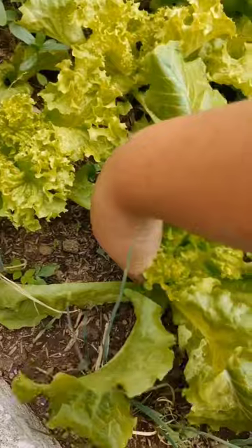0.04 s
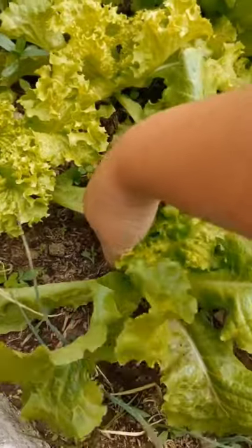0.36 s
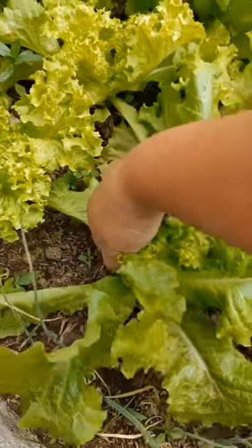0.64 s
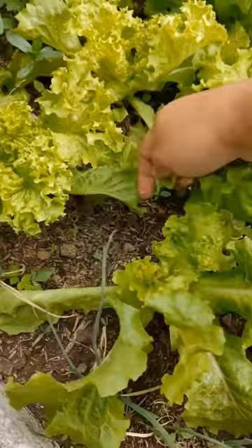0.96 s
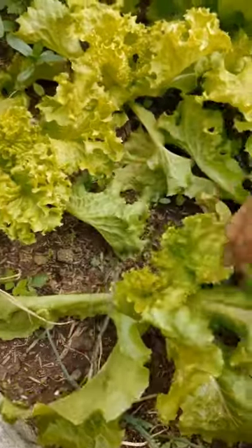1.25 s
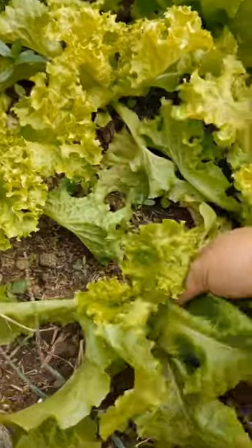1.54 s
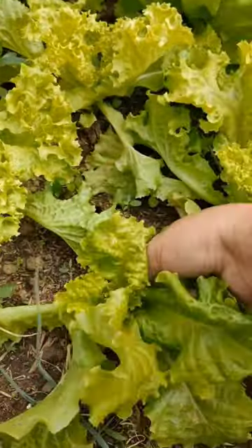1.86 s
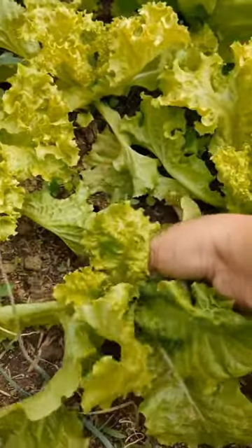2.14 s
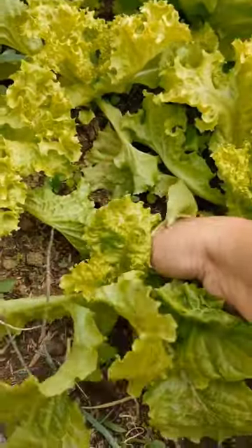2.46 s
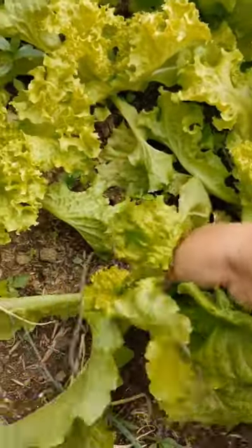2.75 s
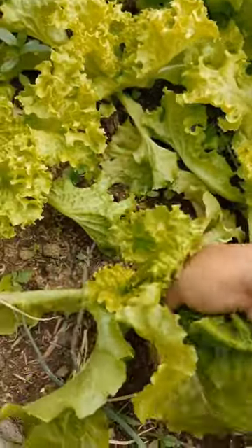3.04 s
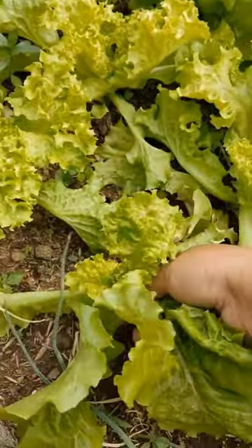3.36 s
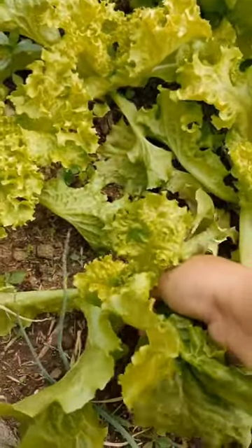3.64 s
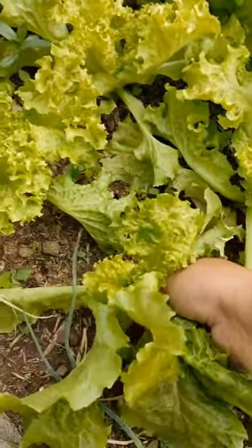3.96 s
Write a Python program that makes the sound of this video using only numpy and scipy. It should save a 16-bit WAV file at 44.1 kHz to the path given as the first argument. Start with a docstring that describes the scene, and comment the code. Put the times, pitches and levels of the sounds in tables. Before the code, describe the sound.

A hand breaks off lettuce leaves close by in two main bursts of crisp cracking and tearing. Between and after them the gathered leaves crinkle and tick, with a quiet outdoor rumble and faint hiss behind.

```python
"""A low outdoor rumble comes first, with a weak hum, faint hiss, hollow swells and a soft brush of leaves.
Then a hand breaks lettuce leaves off at the stalk, close by, in two main bursts. Each crisp rib
fractures with an impulse that rings leaf and stalk; fibres tear in dense runs of tiny clicks, and a
wet stalk squeaks once. Friction makes the gathered leaves crinkle and tick against each other."""
import sys
import numpy as np
from scipy import signal
from scipy.fft import rfft, irfft
from scipy.io import wavfile

SR = 44100
rng = np.random.default_rng(int(sys.argv[2]) if len(sys.argv) > 2 else 0)


def file_out(sig):
    """Save sig as 16-bit WAV at sys.argv[1]."""
    # one column per channel
    cols = np.atleast_2d(sig).T
    # limit, then scale
    lim = np.clip(cols, -1, 1)
    pcm = np.round(lim * 32767).astype(np.int16)
    wavfile.write(sys.argv[1], SR, pcm)


N = 176400
T, HZ = np.arange(N) / SR, np.fft.rfftfreq(N, 1 / SR) + 1
LOW_PATCHES = dict(patch_hz=68.7, patch_s=0.041)  # narrower and slower, for the bass

def amp(db):
    """Amplitude ratio: tenfold for every 20 dB."""
    return 10 ** (np.asarray(db) / 20)

def unit(x):
    """Normalisation to rms 1."""
    return x / np.sqrt(np.mean(x ** 2) + 1e-20)

def contour(points):
    """Linear interpolation over time."""
    return np.interp(T, *np.transpose(points))

def spectrum(points, hz=HZ):
    """Interpolation over log frequency."""
    f, value = np.transpose(points)
    return np.interp(np.log(hz), np.log(f), value)

def shaped(x, gain):
    """Filtering by spectral multiplication, normalised to rms 1."""
    return unit(irfft(rfft(x) * gain, N))

def bell(hz, octaves, axis_hz=HZ):
    """A Gaussian passband in log frequency."""
    return np.exp(-.5 * (np.log2(axis_hz / hz) / octaves) ** 2)

def spread(pair, apart):
    """Mid-side stereo: the sum and difference of two signals give left and right."""
    mid, side = pair[0], apart * pair[1]
    return np.array([mid + side, mid - side]) / np.sqrt(1 + apart ** 2)

def patchy(x, db, patch_hz=300, patch_s=0.024):
    """Random modulation over time and frequency, heard as resonances that come and go; rms 1."""
    frames = dict(fs=SR, nperseg=1024, noverlap=768)
    hz, t, z = signal.stft(x, **frames)
    across = np.fft.fftfreq(len(hz), hz[1])[:, None] * patch_hz
    along = np.fft.fftfreq(len(t), t[1]) * patch_s
    smoothing = np.exp(-2 * (across ** 2 + along ** 2))
    field = np.fft.ifft2(np.fft.fft2(rng.standard_normal(z.shape[1:])) * smoothing).real
    return unit(signal.istft(z * amp(db * unit(field)), **frames)[1][:, :N])

# Likeness of left and right in the background: (frequency [Hz], correlation [1])
AIR_CORRELATION = [(35, .05), (80, 0.88), (250, 0.9), (550, 0.75), (1100, 0.022), (3000, 0.12),
                   (8000, 0.99)]
def air_noise():
    """Partial coherence: the channels share a part of their noise that depends on frequency."""
    common, separate = rfft(rng.standard_normal((2, N)))
    same = np.clip(spectrum(AIR_CORRELATION), -1, 1)
    return irfft(np.array([common, same * common + np.sqrt(1 - same ** 2) * separate]), N)

# Rumble spectrum: (frequency [Hz], relative level [dB])
RUMBLE_SPECTRUM = [(15, -81), (25, -34), (75, -11.5), (108, -1.5), (182, -3.5), (300, -17.5), (468, -25),
                   (578, -23), (687, -25.5), (757, -26), (2500, -42), (3250, -69), (5500, -120)]
# Rumble envelope: (time [s], relative level [dB])
RUMBLE_ENVELOPE = [(0.0, -42.5), (0.1, -45.5), (1.46, -48), (1.54, -48), (1.97, -47.5), (2.0, -47.5),
                   (2.22, -49.5), (2.81, -44.5), (2.83, -47), (2.96, -45.5), (3.51, -42.5), (3.55, -44),
                   (3.89, -43.5), (4.0, -49.5)]
# Balance of rumble and hum: (time [s], left minus right [dB])
RUMBLE_BALANCE = [(.2, 0), (2.9, -0.5), (3.4, -3)]
# Hiss spectrum: (frequency [Hz], relative level [dB])
HISS_SPECTRUM = [(1000, 4), (2500, 1.5), (4500, -6), (7500, -9.5), (10000, -12.5), (15000, -20)]
def outdoors(hum_hz=108.7):
    """Filtered noise gives distant rumble and faint hiss; amplitude modulation makes a hum waver."""
    colour = amp(spectrum(RUMBLE_SPECTRUM)) / np.sqrt(1 + (HZ / RUMBLE_SPECTRUM[-1][0]) ** 4)
    noise = patchy(air_noise(), db=3, **LOW_PATCHES)
    rumble = amp(contour(RUMBLE_ENVELOPE) - 1) * shaped(noise, colour)
    waver = shaped(rng.standard_normal(N), 1 / (1 + (HZ / 4) ** 4))
    hum = amp(-54.5) * unit((1 + 0.43 * waver) * np.sin(2 * np.pi * hum_hz * T))
    hiss = amp(-68.5) * shaped(patchy(air_noise(), db=5.5), amp(spectrum(HISS_SPECTRUM)))
    pan_db = contour(RUMBLE_BALANCE) / 2
    return (rumble + hum) * amp([pan_db, -pan_db]) + hiss

# Hollow swells: (peak time [s], level [dB], half length [s], centre [Hz], width [octaves])
HOLLOW_SWELLS = [(0.102, -49.5, 0.054, 524, 0.59), (3.082, -53.5, 0.037, 598, 0.19),
                 (3.346, -44, 0.039, 172, .8), (3.717, -47.5, .055, 623, 0.42),
                 (1.577, -43, 0.037, 115, 0.32), (2.022, -41.5, 0.022, 128.7, 0.12),
                 (2.86, -40, 0.042, 152, 0.4), (3.128, -44.5, 0.079, 179.6, .2)]
def swells():
    """Band-limited noise under Gaussian envelopes sounds soft and hollow."""
    noise = patchy(air_noise(), db=4, **LOW_PATCHES)
    return sum(amp(db) * np.exp(-.5 * ((T - s) / half) ** 2) * shaped(noise, bell(hz, width))
               for s, db, half, hz, width in HOLLOW_SWELLS)

def scatter(x, decay_s=0.014, rise_s=0.00045):
    """Diffuse reflection: nearby soil and plants return a short, exponentially decaying tail."""
    t = np.arange(6000) / SR
    tail = rng.standard_normal((2, len(t))) * np.exp(-t / decay_s) * (1 - np.exp(-t / rise_s))
    return signal.fftconvolve(x, tail / np.linalg.norm(tail[0]), axes=1)[:, :N]

# Phase between the ports for a fully off-axis source: (frequency [Hz], lead of left [rad])
PORT_LEAD = [(600, 0), (1200, 1.23), (2200, 1.66), (3200, 1.1), (4300, 2), (5600, 1.6), (7500, -2.2),
             (15000, 1.8)]
def ports(x, places=((0, 1, 0),)):
    """Path difference: a close source reaches two microphone ports with unequal phase and level."""
    frames = dict(fs=SR, nperseg=512, noverlap=384)
    hz, t, z = signal.stft(x, **frames)
    s, off_axis, pan_db = np.transpose(places)
    lead = spectrum(PORT_LEAD, hz + 1)[:, None] * np.interp(t, s, off_axis)
    left = np.exp(.5j * lead) * amp(np.interp(t, s, pan_db) / 2)
    return signal.istft(z * np.array([left, 1 / left]), **frames)[1][:, :N]

def centred(x, above_hz=7100):
    """Low-pass filtering of the side signal draws the treble to the middle of the stereo image."""
    mid = x.mean(0)
    return mid + irfft(rfft(x - mid) / (1 + (HZ / above_hz) ** 10), N)

def grains(per_s, spread_db, patches=8, colour_db=4):
    """Shot noise: random clicks of uneven size from several patches of leaf, each with its own colour."""
    out, knots_hz = 0, np.geomspace(500, 16000, 16)
    for _ in range(patches):
        sizes = amp(spread_db * np.minimum(rng.exponential(1, (2, N)), 5))
        clicks = sizes * rng.choice([-1, 1], (2, N)) * (rng.random((2, N)) < per_s / patches / SR)
        colour = amp(colour_db * np.interp(HZ, knots_hz, rng.standard_normal(len(knots_hz))))
        out = out + shaped(clicks, colour)
    return spread(out, apart=0.35)

# Envelope of the brushing leaves: (time [s], relative level [dB])
BRUSH_ENVELOPE = [(0, -62), (.13, -62), (.19, -71.5), (.26, -61.5), (.42, -76.5), (.57, -70.5), (.66, -57),
                  (.78, -57), (.9, -57.5), (1.05, -55.5), (1.12, -66.5), (1.32, -62.5), (1.47, -57),
                  (1.53, -66), (1.59, -49), (1.62, -59), (1.645, -51), (1.71, -50.5), (1.77, -60.5),
                  (1.82, -49), (1.9, -57.5), (1.98, -54), (2.09, -67.5), (2.13, -53), (2.23, -66),
                  (2.56, -69.5), (2.63, -65), (2.75, -63.5), (2.92, -69.5), (3.09, -61), (3.165, -51),
                  (3.26, -71), (3.32, -43), (3.42, -55.5), (3.49, -52.5), (3.56, -68.5), (3.66, -65.5),
                  (3.79, -54), (3.84, -62.5), (3.96, -64)]
# Their spectrum: (frequency [Hz], relative level [dB])
BRUSH_SPECTRUM = [(500, -1.5), (900, -7.5), (1400, 0.5), (2200, 1.5), (3000, 1), (3700, 3.5), (4700, -0.5),
                  (6300, -1.5), (8200, 3), (10500, -9.5), (12500, -12.5), (15300, -12.5)]
# Shelf on their top treble: (time [s], gain [dB])
BRUSH_SHELF = [(0, -11), (1.1, 2), (1.35, 9), (1.85, 3), (2.4, 0), (3.15, -7), (3.35, 10.5), (3.6, -9)]
def brushing(low_hz=597, shelf_hz=10400):
    """Sliding friction: leaves crinkle over each other while frilled edges catch and let go in ticks."""
    colour = amp(spectrum(BRUSH_SPECTRUM)) / np.sqrt(1 + (low_hz / HZ) ** 4)
    crinkle = patchy(shaped(grains(per_s=7000, spread_db=1), colour), db=5)
    ticks = amp(-5.5) * shaped(grains(per_s=200, spread_db=2), colour)
    rustle = crinkle + ticks
    treble = irfft(rfft(rustle) / (1 + (shelf_hz / HZ) ** 10), N)
    rustle = rustle + (amp(contour(BRUSH_SHELF)) - 1) * treble
    return amp(contour(BRUSH_ENVELOPE) - 1.5) * rustle

def squeak(peak_s=2.732, fade_s=0.022, hz=8150, glide_hz_per_s=-5500):
    """Friction of wet stalk slipping on stalk gives a thin, falling, unsteady tone."""
    unsteady = shaped(rng.standard_normal(N), 1 / (1 + (HZ * fade_s) ** 2))
    tone = np.sin(2 * np.pi * np.cumsum(hz + glide_hz_per_s * (T - peak_s)) / SR)
    return amp(-55) * np.exp(-abs(T - peak_s) / fade_s) * (1 + .5 * unsteady) * tone

# Tears: (peak time [s], level [dB], rise [s], fall [s], centre [Hz], lower edge [Hz])
FIBRE_TEARS = [(0.711, -43, 0.0099, 0.0045, 6900, 2400), (0.733, -36, 0.0086, 0.013, 5400, 300),
               (.809, -44, 0.015, 0.012, 6900, 1000), (0.86, -42.5, 0.0094, 0.01, 6700, 1500),
               (0.945, -33.5, 0.011, 0.015, 6000, 350), (1.8, -54.5, .08, 0.06, 1800, 1520),
               (2.659, -51, 0.033, 0.027, 6060, 2200), (2.679, -31, 0.0094, 0.0023, 5600, 2500),
               (2.976, -37.5, 0.011, 0.021, 6500, 500), (3.333, -49, 0.02, 0.035, 2480, 550),
               (3.764, -47, 0.026, 0.056, 12300, 1000), (3.951, -44, 0.018, 0.015, 7600, 2660)]
# Spectrum common to all tears: (frequency [Hz], relative level [dB])
TEAR_SPECTRUM = [(200, -8), (700, 5), (1400, 5.5), (2300, -2), (3200, -1.5), (4400, -3), (6000, 0.5),
                 (8500, 0), (11000, -7.5), (15500, -1.5)]
def tearing():
    """Dense bursts of tiny clicks rise and die away. Most are fibres tearing under the pull; the first row, at
    0.711 s, is a brief hiss that swells into the loudest crack."""
    fibres = patchy(grains(per_s=8000, spread_db=3), db=4.5)
    out = 0
    for s, db, rise, fall, hz, low_hz in FIBRE_TEARS:
        envelope = np.exp(-np.maximum((s - T) / rise, (T - s) / fall))
        colour = amp(spectrum(TEAR_SPECTRUM)) * bell(hz, octaves=1.38) / np.sqrt(1 + (low_hz / HZ) ** 10)
        out = out + amp(db) * envelope * shaped(fibres, colour)
    return out

def ring(t, hz, peak_s):
    """Damped vibration: a sinusoid swells to its peak and dies away."""
    return (t / peak_s * np.exp(1 - t / peak_s)) ** 2 * np.sin(2 * np.pi * hz * t)

def crack(leaf_hz, stalk_hz, stalk_db, crumble_db, rise_s=0.00029, crumble_s=0.003, cells_per_s=7000):
    """Brittle fracture: a rib gives way, leaf and stalk ring, then nearby cells burst one by one."""
    size = 1024
    t, hz = np.arange(size) / SR, np.fft.rfftfreq(size, 1 / SR) + 1
    snap = ring(t, leaf_hz, rise_s) + amp(stalk_db) * ring(t, stalk_hz, peak_s=0.00024)
    colour = bell(leaf_hz, 0.32, hz) + amp(stalk_db + 7.5) * bell(stalk_hz, 0.19, hz)
    bursts = rng.choice([-1, 1], (2, size)) * (rng.random((2, size)) < cells_per_s / SR)
    cells = unit(irfft(rfft(bursts) * colour))
    envelope = np.exp(-t / crumble_s) * (1 - np.exp(-t / rise_s))
    return snap + amp(crumble_db) * envelope * spread(cells, apart=0.77) / np.sqrt(2)

# Rib fractures: (time [s], level [dB], leaf ring [Hz], stalk ring [Hz],
# stalk relative to leaf [dB], crumble relative to leaf [dB])
RIB_CRACKS = [(0.638, -33.5, 5500, 3500, -20, -6.5), (0.658, -35.5, 6400, 3500, -13, -4),
              (0.7102, -13.5, 7600, 3150, -12, -9.5), (0.7163, -25, 7800, 3200, -25, -10),
              (0.7328, -19.5, 5900, 3420, -0.5, -2.5), (.7336, -27, 7600, 1260, -7, -6),
              (.7372, -28, 6300, 2100, -21, -2), (0.742, -26, 6050, 3000, -16, -8),
              (.7494, -25.5, 6600, 3180, -19, -1), (0.8079, -22, 8450, 4040, -5.5, -11),
              (0.8166, -26.5, 8100, 3900, -6, -14), (0.8603, -29.5, 7100, 3400, -6, -8),
              (.8708, -32, 8500, 3800, -6, -10), (.9395, -26, 8200, 3210, -13, 0.5),
              (.953, -35, 7500, 3120, -1, -5), (1.0321, -37, 5700, 2860, -3.5, -7),
              (1.809, -31.5, 7050, 3370, -12, -1.5), (1.849, -32, 7540, 3420, -11.5, 0.5),
              (2.602, -43, 6900, 3800, -5, 2), (2.6721, -20.5, 6960, 4000, -6, -1.5),
              (2.6765, -15, 9570, 3600, -3, -10.5), (2.6768, -22.5, 5660, 2950, -3, -2),
              (2.6789, -24.5, 5950, 2580, -5, -6), (2.9727, -29.5, 7600, 3420, -7, -2.5),
              (3.723, -40, 12500, 3400, -14, 5), (3.7641, -33.5, 12340, 7000, -7, -3),
              (3.901, -36.5, 10400, 5600, -11, 4.5), (3.9498, -21, 8040, 3700, -20, -4.5)]
def ribs():
    """Superposition of transients: closely spaced cracks merge into a crunch."""
    out = np.zeros((2, N))
    for s, db, *timbre in RIB_CRACKS:
        sound = amp(db) * crack(*timbre)
        start = round(s * SR)
        out[:, start:start + sound.shape[1]] += sound[:, :N - start]
    return out

# Where the stalks break: (time [s], off-axis share of the port phase [1], left minus right [dB])
BREAK_PLACES = [(.9, 0.72, -1.5), (2.67, 0.7, -2), (3.3, 0.9, -1)]
def scene():
    """Sound pressures add: the garden behind, the brushing and breaking leaves close by."""
    direct = ribs() + tearing() + squeak()
    breaking = ports(direct + amp(-14.5) * scatter(direct), BREAK_PLACES)
    return breaking + centred(ports(brushing())) + swells() + outdoors()

def record(dry, left_db=-0.32, right_db=-0.62, edge_hz=15550):
    """Band limiting: a linear-phase low-pass filter follows the channel balance."""
    lowpass = signal.firwin(255, edge_hz, window=("kaiser", 8), fs=SR)
    return signal.oaconvolve(dry * amp([[left_db], [right_db]]), lowpass[None], "same")

dry = scene()
out = record(dry)
file_out(out)
```